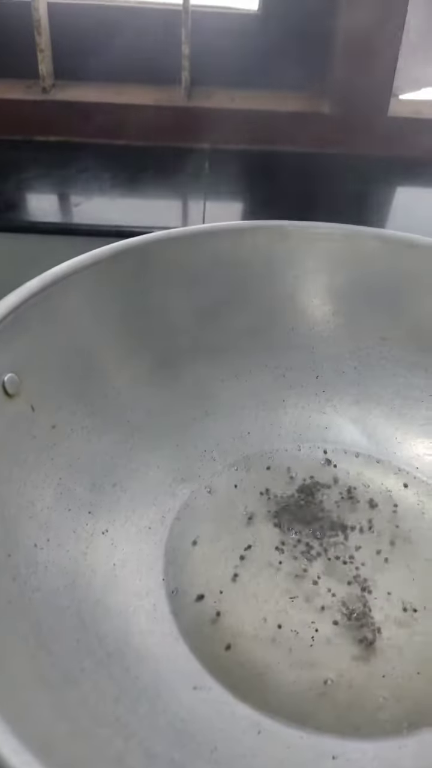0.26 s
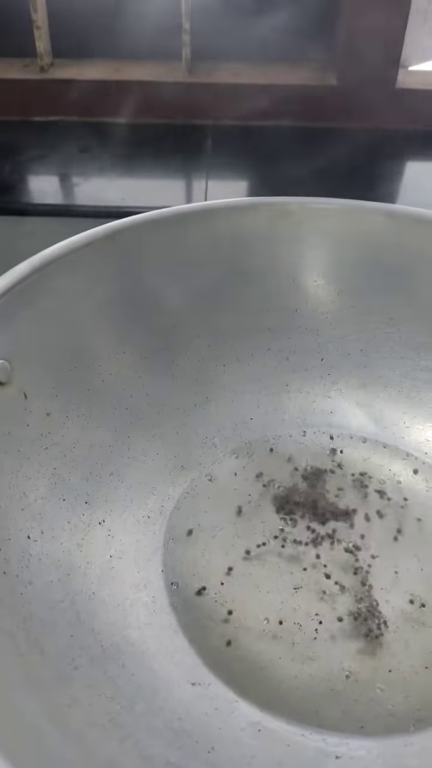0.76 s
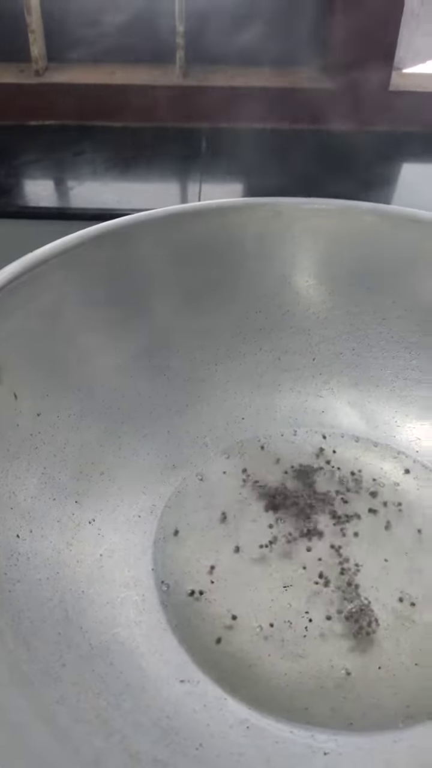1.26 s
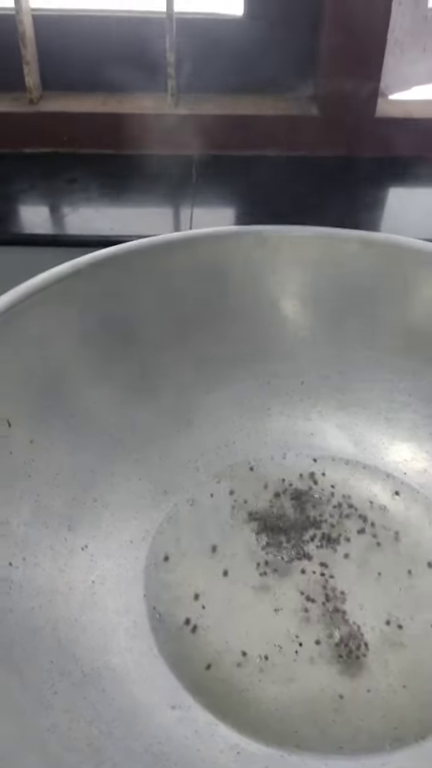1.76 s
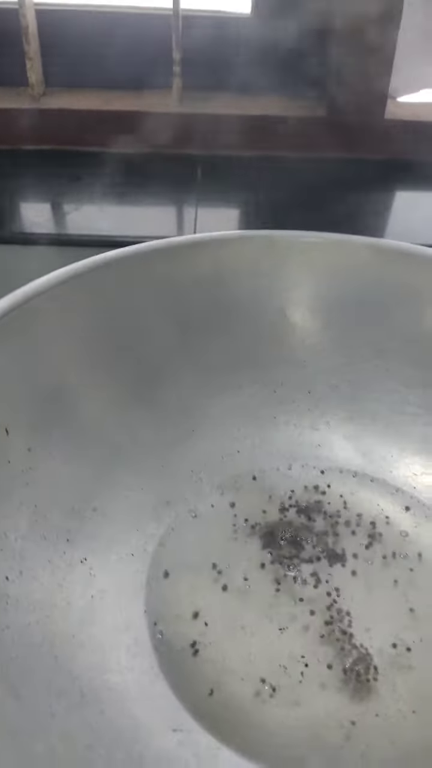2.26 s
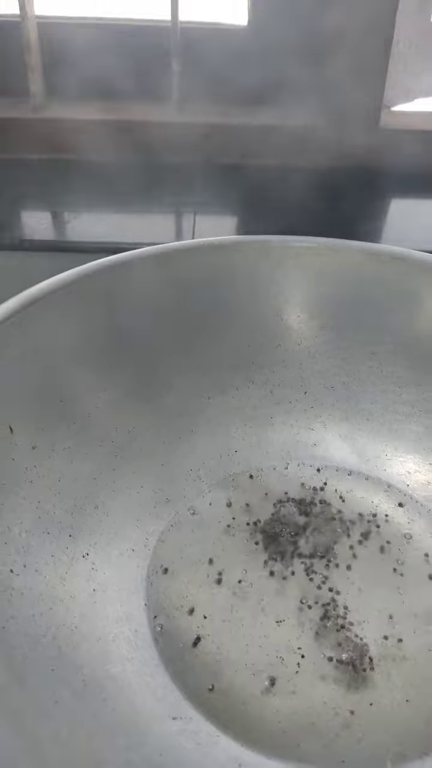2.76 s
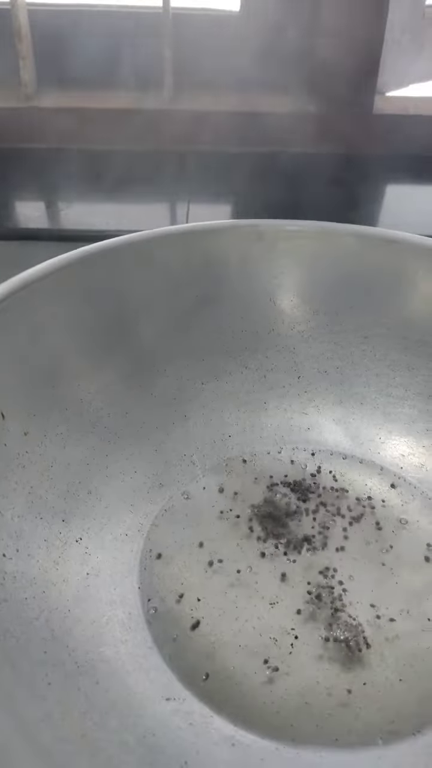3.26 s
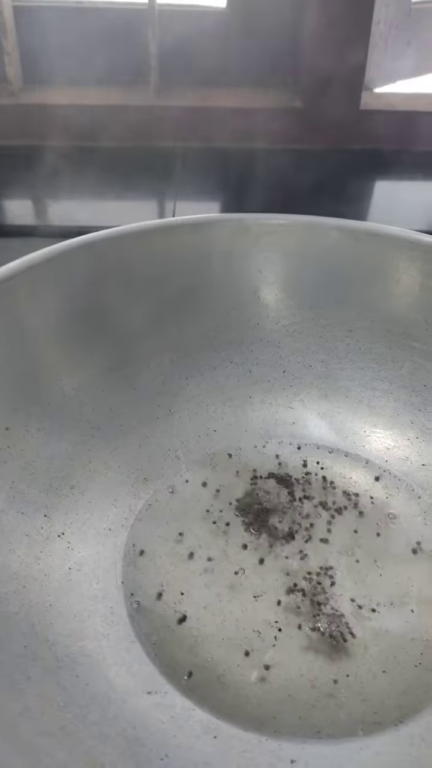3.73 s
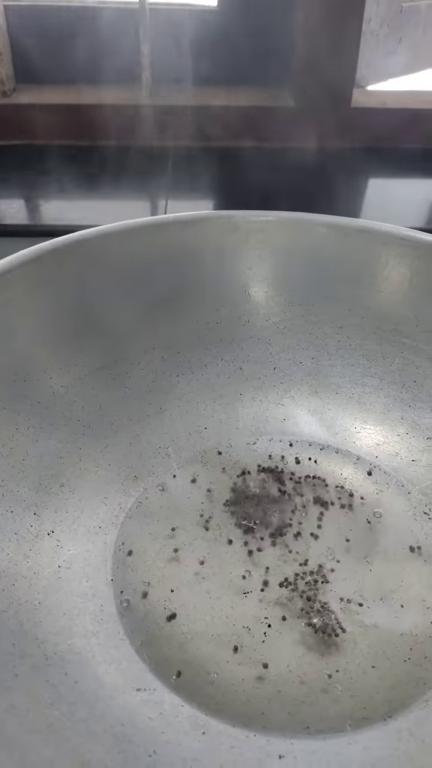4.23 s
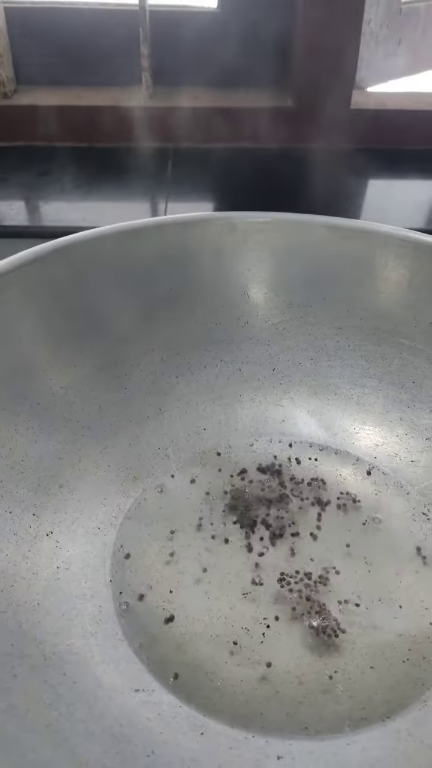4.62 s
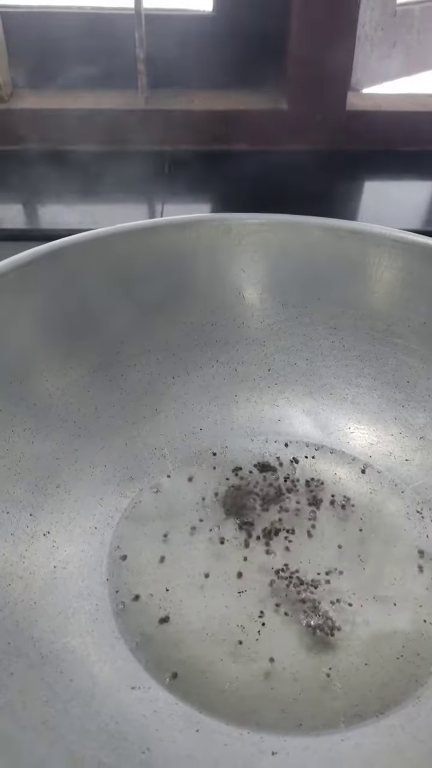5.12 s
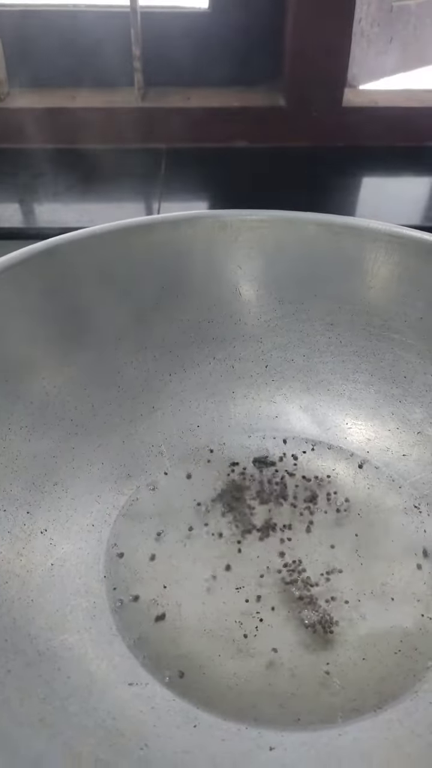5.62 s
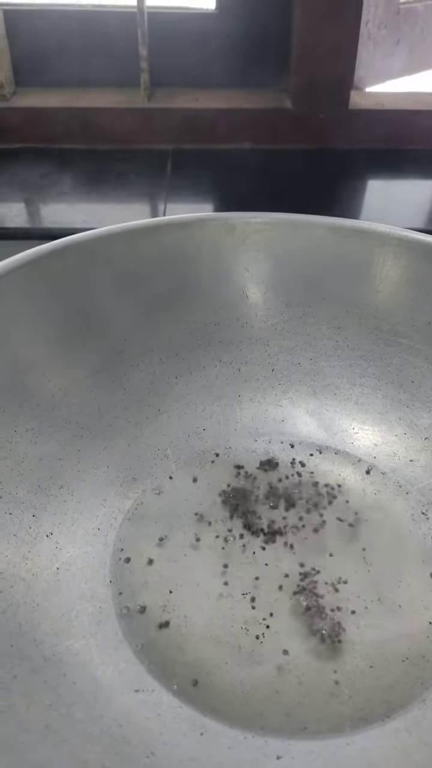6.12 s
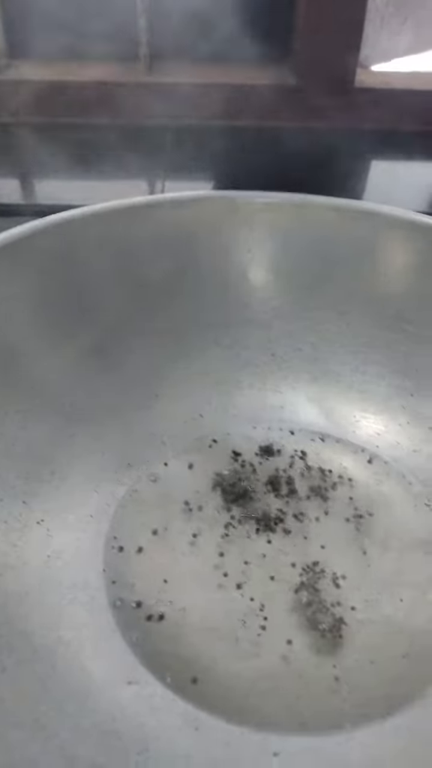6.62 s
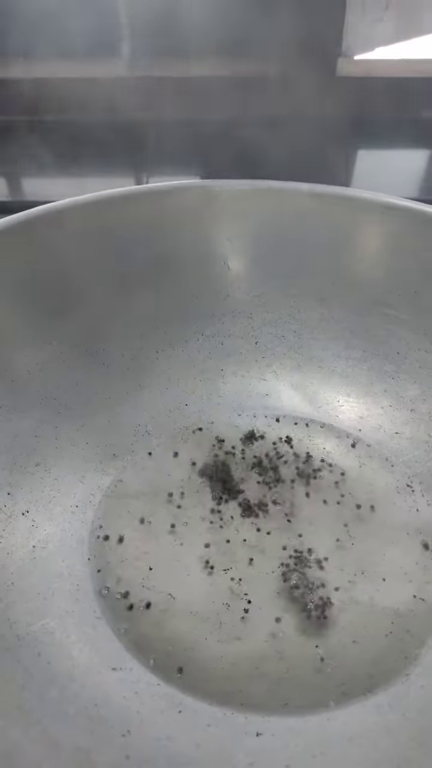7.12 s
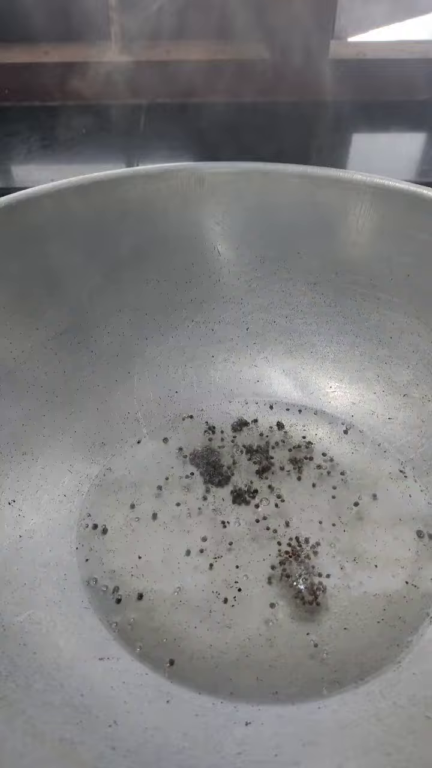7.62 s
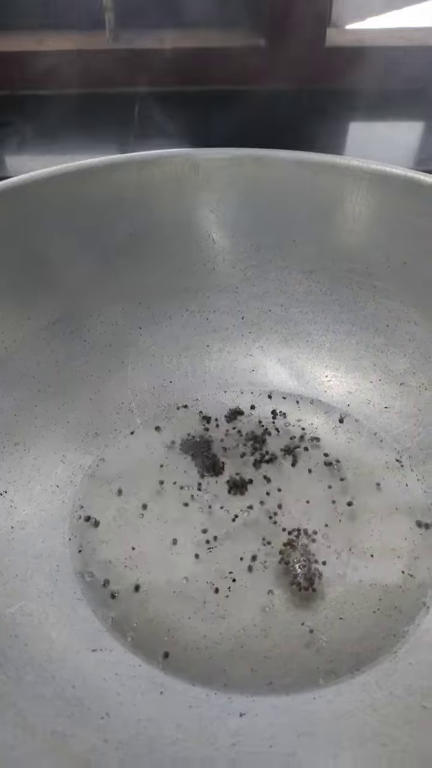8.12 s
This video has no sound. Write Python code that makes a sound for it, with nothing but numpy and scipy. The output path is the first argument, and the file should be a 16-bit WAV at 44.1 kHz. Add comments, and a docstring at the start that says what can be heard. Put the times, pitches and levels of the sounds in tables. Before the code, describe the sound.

Close, loud, irregular cracks of seeds bursting in hot oil ring a metal pan, with soft hissing and a low burner rush beneath.

```python
"""A stove murmurs (shaped noise and narrow drones) under a fine sizzle of hot oil (hiss and random ticks).
Mustard seeds burst one by one in an aluminium wok, close to a phone in a hard-walled kitchen.
Each pop is shaped noise: a spurt of steam, a click and sharp split, then a rattle that rings the bowl.
The room's tail dies after it, and the sizzle flares up and calms down again.
The phone's limiter ducks at every loud pop, so the room and the sizzle swell back just after it."""
import sys
import numpy as np
from scipy import signal
from scipy.fft import rfft, irfft, next_fast_len
from scipy.io import wavfile
from scipy.ndimage import uniform_filter1d, minimum_filter1d, map_coordinates

SR = 44100
rng = np.random.default_rng(int(sys.argv[2]) if len(sys.argv) > 2 else 0)


def transcribe(u):
    """Save the signal u as a 16-bit wav file named by the first command-line argument.

    u: samples, shape (n,) or (channels, n), limited to [-1, 1]; the rate is SR.
    q: integer samples, one column per channel.
    """
    v = np.clip(np.atleast_2d(u).T, -1, 1)
    q = np.round(v * 32767).astype(np.int16)
    wavfile.write(sys.argv[1], SR, q)


N = 369558
TIME = np.arange(N) / SR  # seconds

# bursting seeds: (time [s], relative strength [dB], body near 2 kHz [dB], snap near 4 kHz [dB],
# edge over 10 kHz [dB], ring [Hz], left minus right [dB], time for the rattle to fall 60 dB [s]);
# body, snap and edge are set against the crack near 8 kHz
SEED_POPS = [(0.0458, -6.5, -4.5, 4, -9, 3200, 1.5, 0.033), (0.166, -3.5, 1, -1, -27, 2050.0, -3, 0.04),
             (0.191, -3, 0.5, 1, -21, 2000, 1, 0.04), (0.612, -9.5, 5.0, 2.5, -16, 2180, -2.5, 0.035),
             (0.8718, -27.5, -24.0, -9.0, -32.0, 2480.0, -7, 0.03),
             (0.9397, -4.0, 1.5, 3.5, -13, 1680, 4, 0.026), (0.9782, -9.5, -4.5, -7, -26, 2520, 4, 0.047),
             (1.0668, -3, 0, 0.5, -14.5, 2400, 4.5, 0.016), (1.2985, -16, -4, -8, -19, 3140.0, -4, 0.046),
             (1.3163, -2.5, -3.5, -2, -13, 2620, 5.5, 0.035), (1.3425, -2, 0, -2.5, -20, 1830, 2, 0.04),
             (1.505, -8, -3.5, -1.5, -17, 2900, -0.5, 0.024),
             (1.578, -1, -13.5, -6.5, -24, 3020, 7.5, 0.036),
             (1.9134, -7, -25.5, -2.5, -25, 1970, 1.5, 0.027),
             (2.0034, -8.5, -3.5, -1.5, -28, 2910.0, -3.0, 0.046),
             (2.1154, -7.5, 2, 1, -17, 2640, -0.5, 0.034), (2.1932, -3.5, -8.5, -4, -22, 2630, 3, 0.049),
             (2.3451, -15, -11, 7.5, -2, 2900, 2, 0.026), (2.4661, -2.5, -13.5, -3, -22, 2950, -1.5, 0.053),
             (2.614, -8, -5, 7.5, -25, 3020, 1.5, 0.034), (2.6655, 0, -3, -9.0, -23, 2600, -1.5, 0.024),
             (2.7581, -0.5, 0.5, -1, -15, 1780, 3.5, 0.068), (3.389, -19, -9, 2, -24, 2500, -3, 0.019),
             (3.454, -5.5, -3.5, -2, -15, 3000, -0.5, 0.062),
             (3.5801, -2.5, 4.5, -3, -9, 2410.0, -0.5, 0.021), (3.7288, -7, -5, 2.5, -18, 2610.0, 4, 0.062),
             (3.9061, -7, -2.5, 1.5, -5, 2900, -6, 0.038), (4.0328, -7, -2.5, 3, -28, 2580, -3.0, 0.023),
             (4.116, -6, -9.5, -2.5, -21, 2520.0, 0, 0.032), (4.1498, -6, 0.5, -1, -18, 2170, 1, 0.029),
             (4.172, -8.5, -4, -4.0, -17, 2200, 1, 0.032), (4.4639, -8, -17.5, 0.5, -22, 3190.0, -1, 0.041),
             (4.5057, -8.5, -16, 0.5, 4.5, 3240, 2.5, 0.033), (4.683, -5.5, 4.5, 4, -19, 2290, 2, 0.053),
             (4.9857, -4.5, -0.5, 3, -15, 2380, -3, 0.051), (5.11, -28.5, -6.0, 14, -33, 2930.0, -3, 0.034),
             (5.342, -7, -9.5, 1, -32, 2800.0, -3.5, 0.025),
             (5.3859, -6.5, -0.5, -0.5, -19, 1710.0, -1, 0.036),
             (5.5525, -3.5, -2, -4, -21.5, 2650, 5, 0.037),
             (5.8087, -1.5, -2.5, -10, -14.5, 2150, 4.5, 0.037),
             (5.895, -3, -0.5, -4.5, -13, 1810, 1.5, 0.035), (6.0998, -0.5, -9, -9.5, -15, 2040, -1, 0.028),
             (6.416, -28, -20, -13, -24, 2140.0, -3.0, 0.03), (6.548, -7, -4, -3.5, -6.5, 2090, -3, 0.022),
             (6.627, -2, -1.5, -3.5, -22, 2080.0, -2, 0.017),
             (7.0119, 0, -5, -7.5, -15.0, 2140.0, 1.0, 0.035), (7.7761, -19, -17, -9, -24, 3130, -2, 0.039),
             (7.868, -5, -1, 0, -8.5, 2930, 4, 0.041)]


def amp(db):
    """Turns decibels into a gain."""
    return 10 ** (np.asarray(db) / 20)


def unit(x):
    """Scales x to an average (rms) level of 1."""
    return x / np.sqrt(np.mean(x ** 2) + 1e-20)


def along(points, hz):
    """Reads a curve of (Hz, value) points on a logarithmic frequency axis."""
    f, v = np.transpose(points)
    return np.interp(np.log(hz + 1), np.log(f + 1), v)


def bump(hz, centre, width):
    """The shape of a resonance: 1 at its centre, one half at width Hz to either side."""
    return 1 / (1 + ((hz - centre) / width) ** 2)


def wobble(rate):
    """A smooth random curve with rate random knots a second."""
    knots = rng.standard_normal(int(N * rate / SR) + 4)
    return map_coordinates(knots, [TIME * rate])


def filtered(x, response):
    """Multiplies the spectrum of x by a response of frequency."""
    size = next_fast_len(N + SR // 2)
    spectrum = rfft(x, size) * response(np.fft.rfftfreq(size, 1 / SR))
    return irfft(spectrum, size)[..., :N]


def coloured(x, level_db, size=1024):
    """Filters x by the gain level_db(Hz), with nothing sounding ahead of its cause."""
    cepstrum = irfft(np.log(amp(level_db(np.fft.rfftfreq(size, 1 / SR)))))
    # folding the cepstrum forward in time makes the filter causal
    cepstrum[1:size // 2] *= 2
    cepstrum[size // 2 + 1:] = 0
    impulse = irfft(np.exp(rfft(cepstrum)))
    return signal.fftconvolve(x, impulse[None], axes=1)[:, :x.shape[1]]


def rush(spectrum):
    """Steady stereo noise of rms 1, more alike left and right in the bass."""
    # (frequency [Hz], left-right likeness [0 to 1])
    likeness = [(30, 0.55), (130, 0.65), (300, 0.45), (700, 0.016), (9000, 0.015)]

    def response(hz):
        turn = np.arccos(np.clip(along(likeness, hz), -1, 1)) / 2
        return amp(along(spectrum, hz)) * [np.cos(turn), np.sin(turn)]

    mid, side = filtered(rng.standard_normal((2, N)), response)
    return unit(np.array([mid + side, mid - side]))


def stove(level_db, waver_db):
    """The burner's soft rush is shaped noise; its wavering drones are very narrow bands of noise."""
    # colour of the rush: (frequency [Hz], relative level [dB])
    rush_colour = [(20, 2), (45, -7), (90, -14.5), (140, -8.5), (205, -3.5), (270, -7), (410, -3.5),
                   (510, -10), (620, -4.5), (800, -5.5), (930, -7), (1060, -8), (1500, -23.5), (3000, -84)]
    # narrow murmurs of the room: (centre [Hz], half-width [Hz], level before wavering [dB])
    murmurs = [(212.5, 7.3, -66), (200, 37, -70.5), (243, 39, -70), (321.5, 12, -70.5), (950, 31, -68)]
    out = amp(level_db + 1.6 * wobble(9)) * rush(rush_colour)
    for hz, width, db in murmurs:
        drone = filtered(rng.standard_normal(N), lambda f: bump(f, hz, width))
        out = out + amp(db + waver_db * wobble(3.296)) * unit(drone)
    return out


def oil(level_db, ticks_db, ticks_per_s, spread_db):
    """Countless tiny steam bubbles hiss, a little more after each pop; a few larger ones tick."""
    # colour of hiss and ticks: (frequency [Hz], relative level [dB])
    sizzle_colour = [(800, -43), (1300, -19), (1750, -16.5), (2600, -16.5), (3400, -20.5), (4600, -9.5),
                     (6000, -6), (7000, -4.5), (7850, 1.5), (9000, -5.5), (9900, -28.5), (11000, -27),
                     (14700, -30), (16000, -47)]
    # a burst seed sheds moisture: extra sizzle, and how fast it boils off
    flare_db, flare_s = -2, 0.21
    moisture = sum(amp(db) * (TIME > s) * np.exp(-np.abs(TIME - s) / flare_s) for s, db, *_ in SEED_POPS)
    boil = np.sqrt(1 + amp(flare_db) * moisture) * amp(.5 * wobble(6.7))
    starts = rng.random(N) < ticks_per_s / SR
    strength = amp(abs(spread_db) * rng.standard_normal(N))
    bubbles = starts * strength * rng.standard_normal((2, N))
    ticks = unit(coloured(bubbles, lambda hz: along(sizzle_colour, hz)))
    return amp(level_db) * boil * (rush(sizzle_colour) + amp(ticks_db) * ticks)


def kitchen(t, build_s):
    """A fresh stereo room tail of energy 1: noise that builds up, then fades at its own pace in each band."""
    # (frequency [Hz], time to fall 60 dB [s])
    room_fade = [(300, 0.12), (1650, 0.64), (2300, 0.66), (5000, 0.54), (8300, 0.47), (11000, 0.2)]
    hz, s, z = signal.stft(rng.standard_normal((2, len(t))), SR, nperseg=256)
    fading = z * amp(-60 * s / along(room_fade, hz)[:, None])
    tail = signal.istft(fading, SR, nperseg=256)[1][:, :len(t)]
    tail = tail * (1 - np.exp(-t / build_s))
    return tail / np.linalg.norm(tail)


def wok(hz, ring_hz, ripple_db, ripple_hz):
    """Gain in dB from one spot in the pan: the bowl's resonances, the one this spot favours, and a ripple."""
    # resonances of the bowl: (centre [Hz], half-width [Hz], boost [dB])
    resonances = [(1524, 27, 9.5), (1673, 51, 10.5), (1765, 56, 0), (2093, 20, 7.5), (2452, 22, 6),
                  (2835, 18, 3.5), (2980, 80, 3.5), (4808, 79, 2.5), (5410, 46, 2), (6200, 33, 3),
                  (7940, 280, 3.5)]
    bowl = sum(db * bump(hz, centre, width) for centre, width, db in resonances)
    favoured = 5.5 * bump(hz, ring_hz, 300)  # dB, half-width in Hz
    ripple = map_coordinates(rng.standard_normal(2000), [hz / ripple_hz], mode="wrap")
    return bowl + favoured + ripple_db * ripple


def seed_colour(hz, body_db, snap_db, edge_db, ring_hz):
    """Gain in dB of one seed: a fuller pop also thumps more, a higher-ringing one has its body higher up."""
    # centres of thump, body, snap, crack and edge: (frequency [Hz])
    band_centres = [1150, 1750, 4300, 7700, 11500]
    # colour that all pops share: (frequency [Hz], level [dB])
    husk_colour = [(150, -7.5), (600, 1), (1150, 7), (1600, -4), (2700, -0.5), (3450, -5), (4300, 1),
                   (6200, 1), (7900, 2), (9200, 4), (10200, -9.5), (12500, -8.5), (15500, -23)]
    body_shift = (ring_hz / 2100) ** 0.15  # the body moves up with a ring above 2100 Hz
    centres_hz = np.array(band_centres) * [1, body_shift, 1, 1, 1]
    thump_db = -22.5 + 0.78 * body_db
    bands_db = [thump_db, body_db, snap_db, 0, edge_db]
    return along(husk_colour, hz) + along(list(zip(centres_hz, bands_db)), hz)


def burst(t, t60, spurt_db, spurt_s, rise_s, click_db, click_s, split_db, split_s, echo_db, echo_t60,
          lumpy_db, direct_s, lag_s, dull_hz, bright_s):
    """Steam spurts before t = 0, then the husk clicks, splits and rattles round the bowl; energy 1."""
    age = np.maximum(t, 0)

    def fade(life):
        return np.exp(-np.log(1000) * age / life)  # falls 60 dB in its life

    split = amp(split_db) * np.exp(-(age / split_s) ** 2)
    split = split + amp(click_db) * np.exp(-age / click_s)
    echoes = amp(echo_db) * fade(echo_t60)
    envelope = np.sqrt(split ** 2 + fade(t60) ** 2 + echoes ** 2)
    spurt = amp(spurt_db) * np.exp(-np.abs(t) / spurt_s)
    envelope = envelope * (1 - np.exp(-age / rise_s)) + spurt
    # a random level every millisecond makes the sound lumpy
    knots = np.arange(t[0], t[-1], .001)
    lumps = amp(lumpy_db * np.interp(t, knots, rng.standard_normal(len(knots))))
    common = rng.standard_normal(len(t))
    # the straight path reaches the right port first; later bounces differ from port to port
    share = np.exp(-age / direct_s)
    direct = np.array([np.roll(common, round(lag_s * SR)), common])
    grain = np.sqrt(share) * direct + np.sqrt(1 - share) * rng.standard_normal((2, len(t)))
    # bounces round the bowl take the treble away little by little
    lowpass = signal.butter(1, min(dull_hz, SR / 3), fs=SR, output="sos")
    dull = signal.sosfiltfilt(lowpass, grain)
    crack = envelope * lumps * (dull + (grain - dull) * np.exp(-age / bright_s))
    return crack / np.linalg.norm(crack)


def seeds(drive_db):
    """Each seed bursts with its own strength and colour, and the pan and room answer."""
    lead = 384  # samples of escaping steam ahead of each split
    room_db = -11  # the kitchen's answer to every pop
    out = np.zeros((2, N + SR))
    t = np.arange(-lead, SR * 2 // 3) / SR
    for s, db, body_db, snap_db, edge_db, ring_hz, pan_db, t60 in SEED_POPS:
        # the split takes a small share of the rattle's time
        near = burst(t, t60, spurt_db=-14, spurt_s=0.0013, rise_s=0.00089, click_db=-9.5, click_s=0.0005,
                     split_db=4.0, split_s=0.069 * t60, echo_db=-7, echo_t60=0.099, lumpy_db=2.0,
                     direct_s=0.00087, lag_s=.00041, dull_hz=9300, bright_s=0.03)
        near = near * amp(pan_db * np.array([[.5], [-.5]]))
        far = amp(room_db) * np.pad(kitchen(t[lead:], build_s=0.0058), ((0, 0), (lead, 0)))

        def colour(hz):
            seed = seed_colour(hz, body_db, snap_db, edge_db, ring_hz)
            return seed + wok(hz, ring_hz, ripple_db=2.08, ripple_hz=89.95)

        pop = coloured(near + far, colour, size=4096)
        pop = amp(db + drive_db) * pop / np.linalg.norm(pop)
        out[:, round(s * SR) - lead:][:, :len(t)] += pop
    return out[:, :N]


def scene():
    """Adds the stove, the sizzling oil and the popping seeds."""
    murmur = stove(level_db=-53.5, waver_db=3.0)
    sizzle = oil(level_db=-44, ticks_db=-12.5, ticks_per_s=120, spread_db=6)
    pops = seeds(drive_db=21.5)
    return murmur + sizzle + pops


def limiter(x, ceiling_db, sense_s, hold_s, release_s):
    """Turns down quickly when the short-term level passes the ceiling, holds, then recovers."""
    power = uniform_filter1d(np.mean(x ** 2, axis=0), max(2, round(sense_s * SR)))
    needed = np.minimum(0, np.log(amp(ceiling_db) / np.sqrt(np.abs(power) + 1e-12)))
    hold = 2 * round(hold_s * SR / 2) + 1
    held = minimum_filter1d(needed, hold, origin=hold // 2)
    # the cut fades exponentially unless a deeper one replaces it
    cut = np.exp(np.maximum.accumulate(np.log(1e-9 - held) + TIME / release_s) - TIME / release_s)
    return x * np.exp(-uniform_filter1d(cut, size=64))


def saturate(x, top, hardness):
    """Rounds off the tallest spikes, which adds a brief bright edge."""
    return x / (1 + np.abs(x / top) ** hardness) ** (1 / hardness)


def record(dry):
    """The phone's two ports colour the sound, then come its limiter, its headroom and its band limit."""
    # the two microphone ports hear differently: (frequency [Hz], left minus right [dB])
    port_balance = [(60, 3), (150, 5), (600, 4), (1300, 2.5), (2200, -0.5), (3300, -2), (4300, 1),
                    (6000, -3.5), (7600, -6.5), (8800, 2.5), (12000, 0)]
    heard = filtered(dry, lambda hz: amp(along(port_balance, hz) * np.array([[.5], [-.5]])))
    level = limiter(heard, ceiling_db=-10.5, sense_s=0.0025, hold_s=0.12, release_s=0.0053)
    rounded = saturate(level, top=0.95, hardness=3.1)
    return filtered(rounded, lambda hz: hz < 15700)


dry = scene()
out = record(dry)
transcribe(out)
```